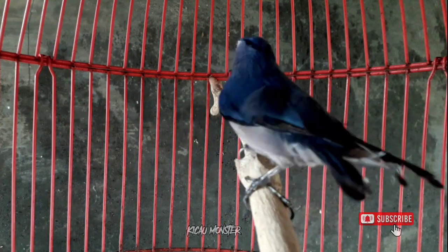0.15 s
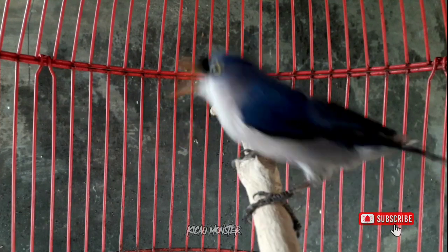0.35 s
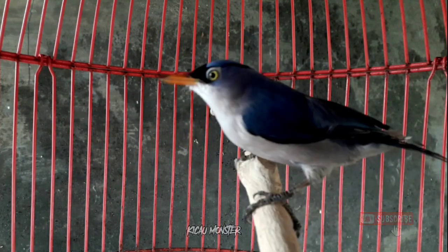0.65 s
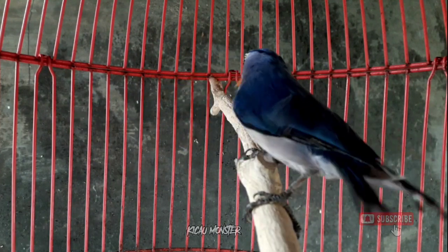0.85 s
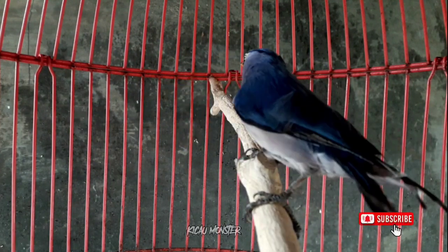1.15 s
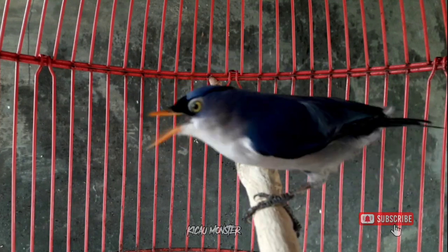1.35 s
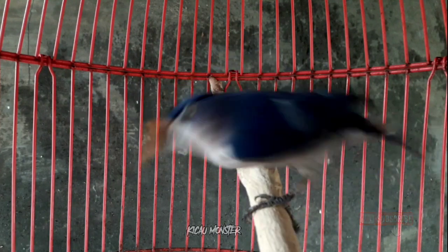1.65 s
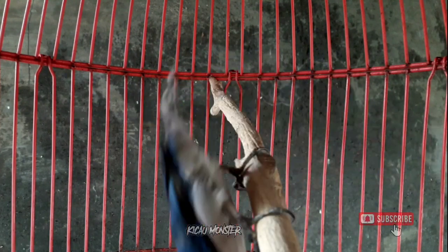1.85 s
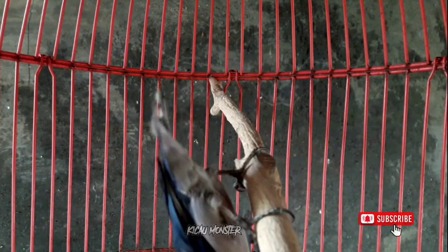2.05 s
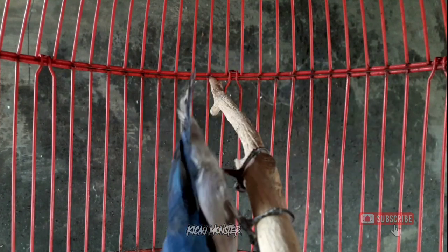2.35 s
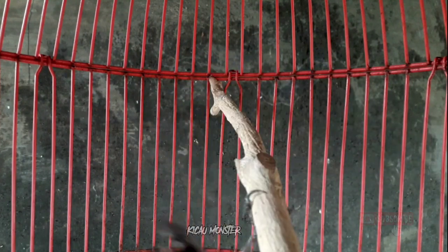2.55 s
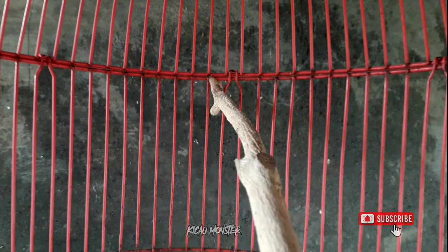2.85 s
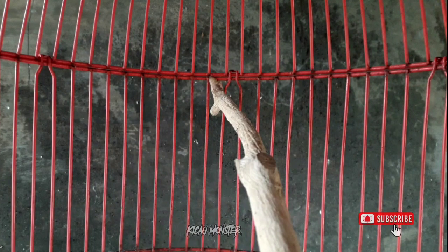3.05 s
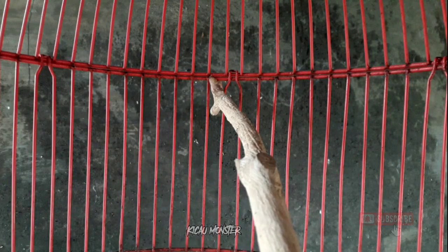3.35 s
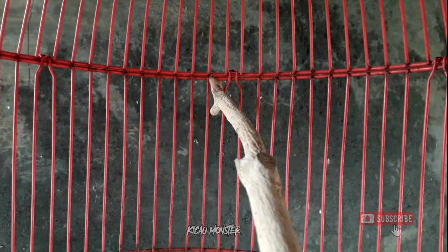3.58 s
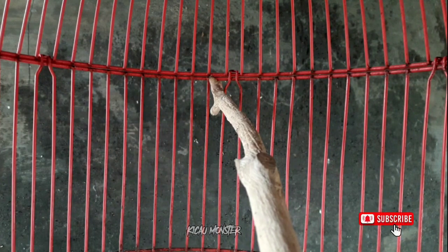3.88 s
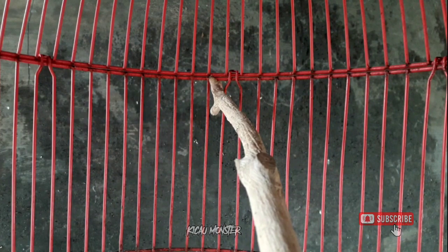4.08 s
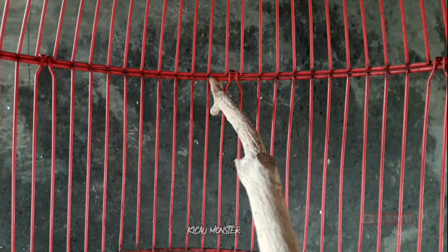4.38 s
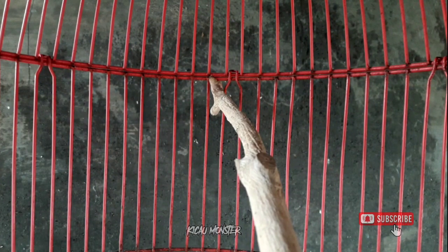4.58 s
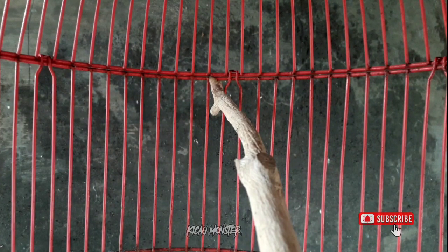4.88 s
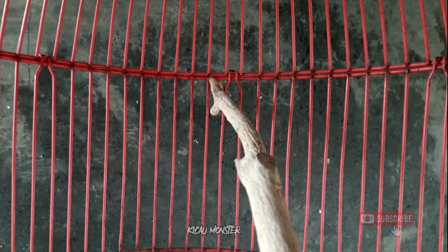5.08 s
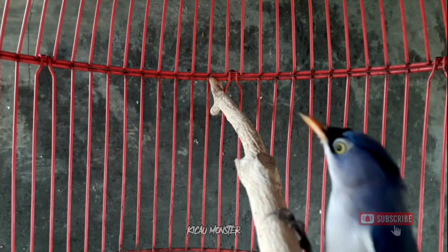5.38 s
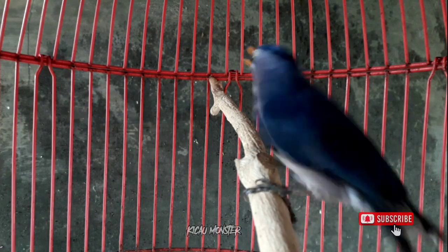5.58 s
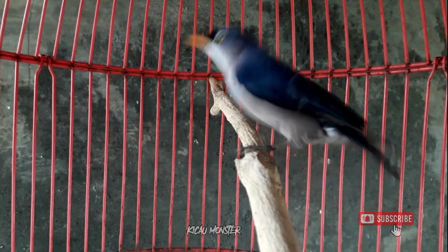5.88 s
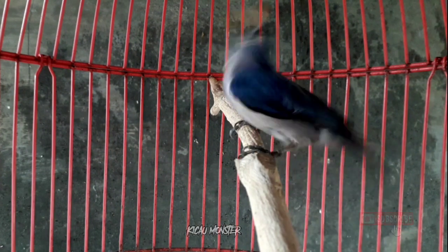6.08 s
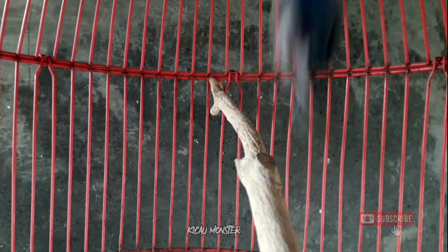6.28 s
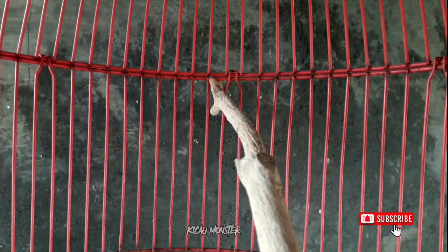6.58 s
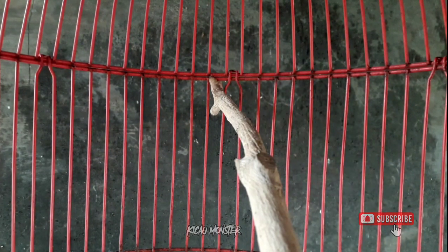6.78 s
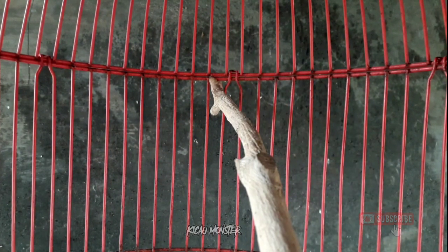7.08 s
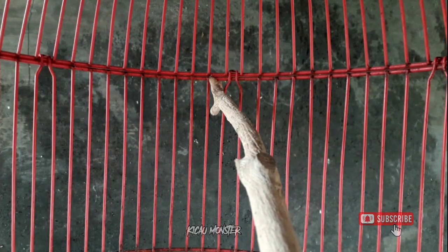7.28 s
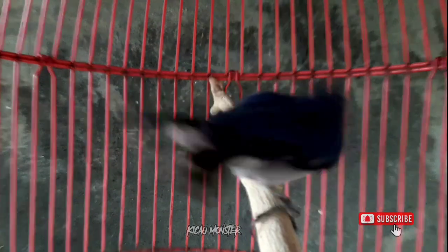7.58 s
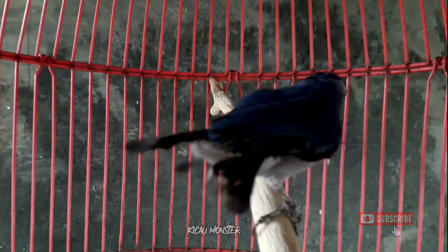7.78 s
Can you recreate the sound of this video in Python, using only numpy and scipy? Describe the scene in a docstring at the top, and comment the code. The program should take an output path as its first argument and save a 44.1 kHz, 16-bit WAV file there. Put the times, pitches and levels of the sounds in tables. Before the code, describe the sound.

Piercing close bird chips in twos and threes give way to clipped double chirps, claws tick on cage wire, and a motorbike hums past.

```python
"""Sharp, close bird chips, mostly in twos and threes, then quick double notes: a caged nuthatch.
Gliding near-sines make its notes, beating and noise make them hoarse, dense echoes are the bars and walls.
Claws tick and ring the wire as filtered noise; other birds glide and waver further off in the yard.
A motorbike, exhaust harmonics over resonant noise, rolls by and slows; background noise swells at times.
Low rumble and flickering hiss form the street behind."""
import sys
import numpy as np
from scipy import signal
from scipy.fft import rfft, irfft, next_fast_len
from scipy.io import wavfile
from scipy.ndimage import uniform_filter1d, minimum_filter1d

SR = 44100
rng = np.random.default_rng(int(sys.argv[2]) if len(sys.argv) > 2 else 0)


def output_pcm(signal):
    """Save a mono or channel-first signal as 16-bit PCM at the path in sys.argv[1].

    Samples are clipped to [-1, 1] before scaling.
    """
    pcm = np.clip(np.atleast_2d(signal).T, -1, 1) * 32767
    wavfile.write(sys.argv[1], SR, np.round(pcm).astype(np.int16))


N = 349713
T = np.arange(N) / SR

# lengths of a chip at the usual pitch; higher chips rebound sooner and are hoarser
USUAL_HZ, WHISTLE_S, REBOUND_S = 6470, .0205, .0185
HURRY_POWER, HOARSE_POWER = 2.1, 2.7
PLUNGE_DB = -4  # against the slur
# the slur flattens into a tail that fades as it settles on its end pitch
TAIL_FROM_S, TAIL_S, TAIL_HZ, TAIL_FADE_DB = .019, .01, 4360, -13
# full chips: (plunge t/s, whistle f/Hz, end f/Hz, whistle level/dB, sweeps level/dB, tail level/dB,
# left minus right level/dB)
FULL_CHIPS = [(.002, 6614, 4020, -10, -12, -20, 10.5), (.282, 6550, 3290, -17, -8.5, -21.5, 8),
              (.41, 6174, 3790, -12.5, -8, -22, 12), (.745, 6716, 3200, -11.5, -10, -27, 12),
              (0.883, 6480, 3950, -16, -12.5, -21, 3.5), (1.282, 6760, 3385, -20.5, -10.5, -23, 14),
              (1.415, 6275, 3360, -15.5, -10, -24.5, 12), (1.868, 6870, 3400, -14.5, -8.5, -26, 9),
              (2.003, 6270, 3470, -15.5, -10.5, -24, 8), (3.076, 6850, 3060, -16.5, -10, -26, 7),
              (3.198, 6454, 3680, -14, -9.5, -25.5, 5), (3.335, 6550, 3175, -22, -12, -26, 8.5)]
# opening whistle that arches: (share of the length, pitch ratio, level/dB)
ARCHED_WHISTLE = [(0, 0.97, -33.5), (.12, .88, -12.5), (.42, .92, -4.5), (.68, 0.97, 7.5), (.86, 0.93, 5.5),
                  (1, 0.99, -6.5)]
# plunge and rebound: (t/s after the plunge starts, f/Hz, level/dB)
PLUNGE_AND_REBOUND = [(-.002, 10930, -21.5), (.0005, 9100, -6.5), (.0025, 7000, 3.5), (.005, 5130, -5.5),
                      (.008, 3900, -23.5), (.010, 4600, -8.5), (.012, 6500, 1.5), (.014, 8500, -14.5),
                      (.017, 9150, -8)]
# long falling slur: (t/s after the slur starts, f/Hz, level/dB)
FALLING_SLUR = [(-.001, 9150, -17.5), (.0015, 9170, -9), (.0045, 6440, 4.5), (.008, 5700, -2),
                (.013, 5400, -7.5)]


def chips(level_db=0, rasp_db=-15, bars_db=-5, bars_t60=0.067):
    """An arched whistle breaks into a plunge that rebounds, then a long slur falls to a low tail."""
    out = np.zeros((2, N))
    for plunge, hz, end_hz, whistle_db, sweeps_db, tail_db, pan_db in FULL_CHIPS:
        start = plunge - WHISTLE_S
        slur = plunge + REBOUND_S * (USUAL_HZ / hz) ** HURRY_POWER
        hoarse = (hz / USUAL_HZ) ** HOARSE_POWER
        tail_shape = [(0, TAIL_HZ, 0),
                      (TAIL_S / 2, end_hz * 1.04, TAIL_FADE_DB / 2),
                      (TAIL_S, end_hz, TAIL_FADE_DB)]
        slur_points = sweep(FALLING_SLUR, slur, sweeps_db)
        tail_points = sweep(tail_shape, slur + TAIL_FROM_S, tail_db)
        notes = [(whistle(ARCHED_WHISTLE, start, plunge, hz, whistle_db), .05),
                 (sweep(PLUNGE_AND_REBOUND, plunge, sweeps_db + PLUNGE_DB), hoarse),
                 (np.vstack([slur_points, tail_points]), 0.87 * hoarse)]
        add(out, start, sing(notes, pan_db, rasp_db, bars_db, bars_t60))
    return undb(level_db) * out


OVERTONE_DB = -17.5  # the strand at one and a half times the whistle
# double notes: (plunge t/s, gap t/s to the second note, whistle f/Hz, whistle level/dB,
# plunge level/dB, second note level/dB, left minus right level/dB)
DOUBLE_NOTES = [(4.196, .035, 6330, -23.5, -14, -8.5, 0.5), (4.487, 0.037, 5850, -16, -7.5, -9, 6.5),
                (5.066, 0.036, 5680, -13.5, -12, -15, 10), (5.647, .033, 5810, -17, -14, -12, 3),
                (6.588, 0.034, 5833, -12, -13.5, -13, 15), (7.343, 0.033, 6170, -16.5, -15, -12, 8),
                (7.865, .04, 5690, -12.5, -11.5, -12.5, 14)]
# opening whistle that swings up, and the strand below it: (share of the length, pitch ratio, level/dB)
SCOOPED_WHISTLE = [(0, 1.04, -17.5), (.2, .98, -2.5), (.45, 1.03, 3), (.68, 1.16, 3.5), (.85, 1.42, -9.5),
                   (1, 0.89, -19)]
LOWER_STRAND = [(0, .58, -23.5), (.4, .51, -29), (.68, .59, -19.5), (.87, .73, -9), (1, .75, -12)]
# plunge without a rebound: (t/s after the plunge starts, f/Hz, level/dB)
BRIEF_PLUNGE = [(-.001, 8910, -19.5), (.0015, 8650, -4.5), (.0045, 6535, 5), (.008, 5396, -3.5),
                (.011, 4200, -8), (.015, 3370, -20.5)]
# second, falling note: (t/s after the gap, f/Hz, level/dB)
FALLING_SECOND_NOTE = [(-.004, 7200, -25), (.002, 6900, -6), (.006, 6500, 2.5), (.011, 5500, 1),
                       (.014, 4400, -9), (.017, 3300, -16.5), (.021, 2500, -19.5)]


def doubles(level_db=0, rasp_db=-18, bars_db=-4.0, bars_t60=0.048):
    """Both sides of the syrinx open together, plunge, and a second falling note follows after a gap."""
    out = np.zeros((2, N))
    for plunge, gap, hz, whistle_db, plunge_db, second_db, pan_db in DOUBLE_NOTES:
        start = plunge - WHISTLE_S
        notes = [(whistle(SCOOPED_WHISTLE, start, plunge, hz, whistle_db), .3),
                 (whistle(LOWER_STRAND, start, plunge, hz, whistle_db), .3),
                 (whistle(SCOOPED_WHISTLE, start, plunge, 1.5 * hz, whistle_db + OVERTONE_DB), .3),
                 (sweep(BRIEF_PLUNGE, plunge, plunge_db), 1),
                 (sweep(FALLING_SECOND_NOTE, plunge + gap, second_db), .7)]
        add(out, start, sing(notes, pan_db, rasp_db, bars_db, bars_t60))
    return undb(level_db) * out


RASP_PAN = .45  # share of the bird's direction that its rasp keeps
# colour of the hoarse noise: (f/Hz, level/dB)
RASP_SPECTRUM = [(100, -13), (1000, -16), (2500, -15), (3900, -4), (6000, 0), (8700, 0), (10000, -7),
                 (15500, -6)]


def sing(notes, pan_db, rasp_db, bars_db, bars_t60):
    """One call: whistles are clean, sweeps hoarse; the bars scatter each call anew."""
    size = 8192
    first_points = notes[0][0]
    start = first_points[0][0]
    tone, effort = np.zeros((2, size))
    for points, hoarse in notes:
        x, env = syrinx(points, waver=.004 + .016 * hoarse, waver_hz=1800, octave_db=-25)
        # in hoarse notes the two sides of the syrinx beat, which throws strands above and below the tone
        beat_hz = 1900 + 350 * walk(300, len(x))
        beat = np.sin(2 * np.pi * np.cumsum(beat_hz) / SR)
        i = max(int((points[0][0] - start) * SR), 0)
        tone[i:i + len(x)] += x * (1 + .22 * hoarse * beat)
        effort[i:i + len(x)] += env ** .55 * (hoarse + .09)
    breath = unit(colour(rng.standard_normal((2, size)), RASP_SPECTRUM))
    rasp = undb(rasp_db) * effort * panned(breath, RASP_PAN * pan_db)
    # the right port hears the bird 11 samples later than the left
    direct = panned(np.array([tone, np.roll(tone, 11)]), np.clip(pan_db, -5, 12))
    scatter = convolve(tone, echoes(bars_t60, gap=0.00075, size=4096))[:, :size]
    return direct + rasp + undb(bars_db) * scatter


def syrinx(points, waver, waver_hz, octave_db):
    """A near sine that glides through (t/s, f/Hz, level/dB) points; returns the tone and its envelope."""
    s, hz, db = np.transpose(points)
    t = np.arange(s[0], max(s[-1], s[0] + .002), 1 / SR)
    glide = uniform_filter1d(np.interp(t, s, hz), size=64)
    pitch = glide * (1 + waver * walk(waver_hz, len(t)))
    phase = 2 * np.pi * np.cumsum(pitch) / SR
    env = undb(np.interp(t, s, db)) * signal.windows.tukey(len(t), .13)
    octave = undb(octave_db) * np.sin(2 * phase) * (pitch < SR / 5)
    return np.sqrt(2) * env * (np.sin(phase) + octave), env


def whistle(shape, start, end, hz, db):
    """Stretch an opening whistle to its length, pitch and level."""
    return np.array(shape) * [end - start, hz, 1] + [start, 0, db]


def sweep(shape, start, db):
    """Set a glide at its time and level."""
    return np.array(shape) + [start, 0, db]


HIND_CLAW_S, HIND_CLAW_DB = 0.0068, -13  # the hind claw closes just after the others
# grips on perch and wire: (t/s, tick level/dB, wire ring level/dB)
GRIPS = [(2.845, -50, -65), (4.652, -36, -60), (4.739, -38.5, -67), (4.804, -36, -56), (4.844, -30.5, -66),
         (4.887, -39, -67), (5.507, -41.5, -62), (6.451, -31, -40), (6.486, -29.5, -43),
         (7.521, -46, -50.5)]
# colour of a tick: (f/Hz, level/dB)
TICK_SPECTRUM = [(500, -9), (2000, -10.5), (5000, -8.5), (8000, 1.5), (11000, -8), (15500, -20.5)]
# cage wire modes: (f/Hz, width f/Hz, level/dB)
WIRE_MODES = [(1480, 150, -8.5), (2230, 260, -11.5), (3590, 27, -1.5), (5190, 200, -7), (6940, 300, -13),
              (8440, 120, -5), (9300, 440, -27), (10900, 280, -12.5), (13600, 400, -15.5)]


def claws(tick_t60=0.049, wire_t60=0.77):
    """Each grip is a dry double tick; on the wires it sets off a fading rattle."""
    out, t = np.zeros((2, N)), np.arange(16384) / SR
    for s, tick_db, ring_db in GRIPS:
        scrape = unit(colour(rng.standard_normal((2, len(t))), TICK_SPECTRUM))
        tick = scrape * undb(tick_db - 60 * t / tick_t60)
        rattle = rng.standard_normal((2, len(t))) * undb(1.3 * walk(250, len(t)))
        ring = unit(resonate(rattle, WIRE_MODES)) * undb(ring_db - 60 * t / wire_t60)
        add(out, s, tick + ring)
        add(out, s + HIND_CLAW_S, undb(HIND_CLAW_DB) * tick)
    return out


SQUAWK_FALL, SQUAWK_WAVER = .12, .075  # shares of the pitch at roughness 1
# a neighbour's thin falling ticks: (t/s, level/dB)
THIN_TICKS = [(1.089, -60), (2.973, -54.5), (3.44, -51), (3.615, -50), (3.807, -47.5), (3.986, -47),
              (6.115, -52.5), (6.289, -51), (6.377, -48.5), (6.811, -50.5), (7.004, -50)]
# their shape: (t/s after the start, f/Hz, level/dB)
THIN_TICK_SHAPE = [(0, 6840, -9.5), (.018, 6670, 4.5), (.026, 6250, 5), (.035, 5500, -6)]
# another's run of whistles that dip and swing up: (t/s, level/dB)
RISING_WHISTLES = [(1.249, -45), (1.489, -43.5), (1.722, -41), (1.954, -46)]
# their shape: (t/s after the start, f/Hz, level/dB)
RISING_SHAPE = [(0, 1739, -25), (.045, 1578, -14.5), (.066, 1823, -1.5), (.088, 2150, 4), (.104, 2710, 0),
                (.112, 2950, -13.5)]
# calls further off, falling more the hoarser they are: (t/s, length t/s, f/Hz, level/dB, roughness)
FAR_CALLS = [(.66, 0.049, 4370, -57, 0.84), (0.923, 0.067, 3570, -49.5, 0.33),
             (0.946, 0.054, 2996, -49.5, 0.3), (0.968, 0.13, 2375, -59, 0.4),
             (6.139, 0.048, 5220, -51, 1.23), (7.055, 0.057, 3630, -49.5, 0.63),
             (7.105, 0.13, 4390, -40, 1.1), (7.213, .09, 6480, -48.5, 1), (7.238, .08, 3180, -37.5, 0.87),
             (7.247, 0.065, 2124, -39.5, 0.88)]


def neighbours(direct_db=-4, wet_db=-2):
    """Other birds, some clear and some harsh, gliding tones heard mostly through the yard's echo."""
    calls = [(sweep(THIN_TICK_SHAPE, s, db), .018) for s, db in THIN_TICKS]
    calls += [(sweep(RISING_SHAPE, s, db), .014) for s, db in RISING_WHISTLES]
    for s, length, hz, db, rough in FAR_CALLS:
        fall = SQUAWK_FALL * rough * hz
        points = [(s, hz + fall, db - 13),
                  (s + length / 2, hz, db + 4.0),
                  (s + length, hz - fall / 2, db - 4)]
        calls.append((points, SQUAWK_WAVER * rough))
    out = np.zeros(N)
    for points, waver in calls:
        tone, _ = syrinx(points, waver, waver_hz=640, octave_db=-44.5)
        add(out, points[0][0], tone)
    wet = convolve(out, echoes(t60=0.34, gap=.004, size=26000))
    return undb(direct_db) * out + undb(wet_db) * wet


# the firing rate and the strongest pitch of the exhaust settle towards idle once the throttle closes
THROTTLE_OFF_S, COAST_S = 4.2, 2.1
FIRING_HZ, IDLE_HZ = 54.84, 40.7
EXHAUST_HZ, IDLE_EXHAUST_HZ = 227, 109
# loudness of the passing bike: (t/s, level/dB)
BIKE_LEVEL = [(4.12, -52.5), (4.21, -32), (4.3, -29.5), (4.5, -30), (4.6, -34), (5.01, -30), (5.09, -42),
              (5.18, -37.5), (5.52, -31.5), (5.67, -42), (5.78, -37), (6.12, -37), (6.51, -36),
              (6.62, -45.5), (7.029, -43.5), (7.421, -55)]
# exhaust resonances: (f/Hz, width f/Hz, level/dB)
EXHAUST_MODES = [(70, 3.3, -6), (138, 6.4, -0.5), (207, 29, -4.5), (252, 8.3, -12.5), (395, 24, -20.5),
                 (598, 12, -15)]


def motorbike(level_db=-1, gas_db=-5, side_db=-12, flutter_db=3, throb_db=2.74, octave_off_db=-40):
    """Harmonics of the firing rate sink and darken as the throttle closes, over a soft boom of gas."""
    s, db = np.transpose(BIKE_LEVEL)
    revs = np.exp(-np.maximum(T - THROTTLE_OFF_S, 0) / COAST_S)
    rate = IDLE_HZ + (FIRING_HZ - IDLE_HZ) * revs
    centre = IDLE_EXHAUST_HZ + (EXHAUST_HZ - IDLE_EXHAUST_HZ) * revs
    turns = np.cumsum(rate * (1 + .007 * walk(25, N))) / SR
    orders = np.arange(2, 7)
    # each harmonic weakens with its distance from the strongest pitch, in octaves squared
    gains = np.array([undb(octave_off_db * np.log2(k * rate / centre) ** 2 + flutter_db * walk(15, N))
                      for k in orders])
    gains = gains / np.sqrt(np.sum(gains ** 2, axis=0))
    hum = sum(g * np.sin(2 * np.pi * (k * turns + rng.random())) for k, g in zip(orders, gains))
    boom_band = signal.butter(2, [45, 550], "band", fs=SR, output="sos")
    gas = signal.sosfilt(boom_band, resonate(rng.standard_normal((2, N)), EXHAUST_MODES))
    mid = unit(hum * undb(throb_db * walk(18, N))) + undb(gas_db) * unit(gas[0])
    side = undb(side_db) * unit(gas[1])
    level = undb(level_db + np.interp(T, s, db, left=-120, right=-120))
    return np.array([mid + side, mid - side]) * level


SWELL_ATTACK_S, SWELL_RELEASE_S, SWELL_BODY_DB = .04, .17, 3.5
# swells of background noise: (t/s, hold t/s, level/dB)
SWELLS = [(0, 0.19, -61), (2.531, 0.43, -58), (3.753, 0.46, -62), (4.828, 0.17, -51), (5.451, 0.21, -51),
          (6.434, 0.083, -52), (7.135, 0.12, -50.5), (7.606, 0.23, -50.5)]
# faint resonances in the swells: (f/Hz, width f/Hz, level/dB)
SWELL_MODES = [(616, 90, 2), (1282, 110, 3), (2120, 460, -2)]


def background_swells(ring_db=-6, surge_db=2):
    """Uneven swells of background noise with a dull body and faint resonances."""
    levels = sum(undb(db) * swell(s, SWELL_ATTACK_S, hold, SWELL_RELEASE_S) for s, hold, db in SWELLS)
    noise = wash(SWELL_BODY_DB, hiss_db=-3.0, flicker_db=2.18) * undb(surge_db * walk(7, N))
    return levels * (noise + undb(ring_db) * resonate(noise, SWELL_MODES))


# road noise of the bike: comes up quickly, fades as it leaves, then drops away
ROAD_ATTACK_S, ROAD_HOLD_S, ROAD_RELEASE_S, ROAD_FADE_DB_PER_S = 0.11, 3.4, 0.53, 4
ROAD_RUMBLE_DB, ROAD_HISS_DB = -44, -48.5  # before the fade and the dulling
ROAD_DULL_HZ = 5000  # distance takes the treble off its hiss
RUMBLE_DB, HISS_DB = -58.5, -70  # the quiet street


def street():
    """Steady far traffic, and the dull road noise of the bike as it leaves, both filtered noise."""
    road = swell(THROTTLE_OFF_S, ROAD_ATTACK_S, ROAD_HOLD_S, ROAD_RELEASE_S)
    road = road * undb(-ROAD_FADE_DB_PER_S * (T - THROTTLE_OFF_S))
    dulling = signal.butter(1, ROAD_DULL_HZ, fs=SR, output="sos")
    tyres = signal.sosfilt(dulling, wash(ROAD_RUMBLE_DB, ROAD_HISS_DB, flicker_db=1.4))
    return wash(RUMBLE_DB, HISS_DB, flicker_db=1.2) + road * tyres


# noise spectra: (f/Hz, level/dB per Hz)
RUMBLE_SPECTRUM = [(25, -26.5), (45, -13.5), (70, 5), (95, 0.5), (130, -0.5), (200, -2), (280, -8.5),
                   (450, -21), (800, -32.5), (2000, -86.5)]
HISS_SPECTRUM = [(200, -3), (400, -2), (620, 4), (900, 1.5), (1300, -1), (1600, -5.5), (2200, -0.5),
                 (3000, -13), (5000, -8), (8500, -7), (9800, -18.5), (15500, -25.5)]


def wash(rumble_db, hiss_db, flicker_db):
    """A rumble nearly alike on both sides and a diffuse hiss that flickers."""
    low_noise = rng.standard_normal(N) + 0.16 * rng.standard_normal((2, N))
    high_noise = .5 * rng.standard_normal(N) + rng.standard_normal((2, N))
    low = unit(colour(low_noise, RUMBLE_SPECTRUM))
    high = unit(colour(high_noise, HISS_SPECTRUM))
    flicker = flicker_db * (walk(18, N) + walk(90, N))
    return low * undb(rumble_db) + high * undb(hiss_db + flicker)


def swell(start, attack, hold, release):
    """Envelope that is fully up at start, holds, and dies away."""
    return np.interp(T, [start - attack, start, start + hold, start + hold + release], [0, 1, 1, 0])


def undb(db):
    """Turn decibels into a gain."""
    return 10 ** (np.asarray(db) / 20)


def unit(x):
    """Scale to rms 1."""
    return x / np.sqrt(np.mean(x ** 2) + 1e-18)


def add(out, s, x):
    """Mix x into out from time s."""
    i = int(round(s * SR))
    a, b = max(i, 0), min(i + x.shape[-1], N)
    if b > a:
        out[..., a:b] += x[..., a - i:b - i]


def colour(x, points):
    """Filter by a spectrum of (f/Hz, level/dB) points, joined on a log frequency scale."""
    hz, db = np.transpose(points)
    size = next_fast_len(x.shape[-1])
    f = np.fft.rfftfreq(size, 1 / SR) + 1
    gain = undb(np.interp(np.log(f), np.log(hz), db))
    return irfft(rfft(x, size) * gain, size)[..., :x.shape[-1]]


def walk(rate, size):
    """Smooth chance with a spread near 1: random points, rate per second, joined by lines."""
    at = np.arange(size) * rate / SR
    return 1.2 * np.interp(at, np.arange(2048), rng.standard_normal(2048), period=2048)


def panned(x, pan_db):
    """Place a sound between left and right at constant power."""
    g = undb(np.array([[pan_db], [-pan_db]]) / 2)
    return x * unit(g)


def echoes(t60, gap, size):
    """Dense decaying reflections of unit energy, different on each side."""
    t = np.arange(size) / SR
    h = rng.standard_normal((2, size)) * undb(-60 * t / t60) * np.clip(t / gap - 1, 0, 1)
    return unit(h) / np.sqrt(size)


def convolve(x, h):
    """Pass a sound through a stereo response."""
    return signal.fftconvolve(np.atleast_2d(x), h, axes=1)[:, :N]


def resonance(hz, modes):
    """Gain of (f/Hz, width f/Hz, level/dB) resonances at the given frequencies."""
    return np.sqrt(sum(undb(2 * db) / (1 + ((hz * hz - f * f) / (hz * width)) ** 2)
                       for f, width, db in modes))


def resonate(x, modes):
    """Pass a sound through a set of resonances."""
    size = next_fast_len(x.shape[-1])
    gain = resonance(np.fft.rfftfreq(size, 1 / SR) + 1, modes)
    return irfft(rfft(x, size) * gain, size)[..., :x.shape[-1]]


# colour of the open yard's tail: (f/Hz, level/dB)
YARD_SPECTRUM = [(200, -9), (2000, 13.5), (6500, -4), (9000, -1), (11000, -4.5), (15500, -11.5)]


def scene():
    """The cage and the other birds in their yard, with the street behind."""
    cage = chips() + doubles() + claws()
    # near walls answer briefly; the open yard keeps a faint, duller tail
    walls = undb(-14) * echoes(t60=0.15, gap=.005, size=12000)
    tail = undb(-27.5) * colour(echoes(t60=0.46, gap=0.004, size=30000), YARD_SPECTRUM)
    yard = cage + convolve(cage, walls) + convolve(cage, tail) + neighbours()
    return yard + motorbike() + street() + background_swells()


TOP_HZ = 15750  # the treble is cut above this
# the right port hears the treble differently: (f/Hz, level/dB)
RIGHT_PORT = [(4500, 2.41), (7200, -0.5), (8500, 1.5), (12000, 4)]


def record(dry):
    """One port colours the treble, a fast limiter holds the loudest peaks, and the top is cut."""
    ports = np.array([dry[0], colour(dry[1], RIGHT_PORT)])
    need = 1 / np.maximum(np.abs(ports).max(axis=0), 1)
    gain = uniform_filter1d(minimum_filter1d(need, size=65), size=65)
    top_cut = signal.ellip(10, .2, 70, TOP_HZ, fs=SR, output="sos")
    return signal.sosfilt(top_cut, ports * gain)


dry = scene()
out = record(dry)
output_pcm(out)
```